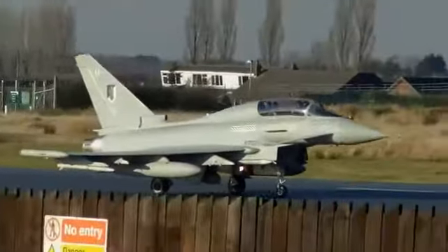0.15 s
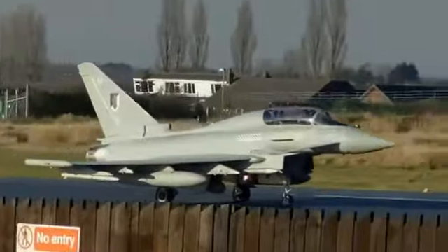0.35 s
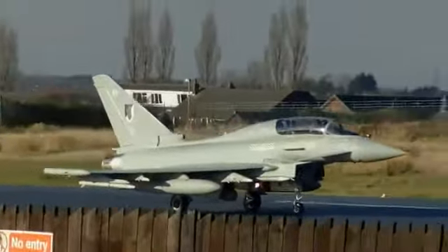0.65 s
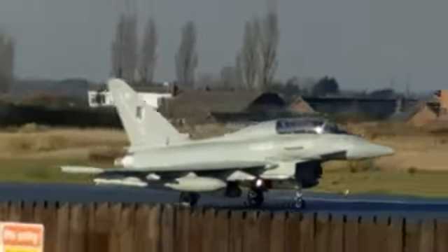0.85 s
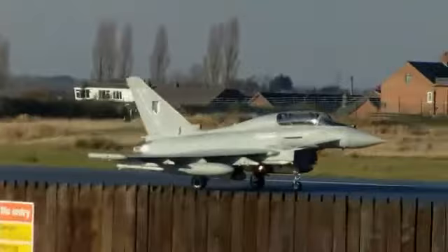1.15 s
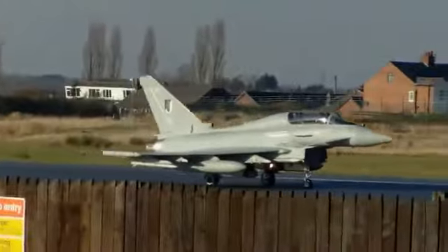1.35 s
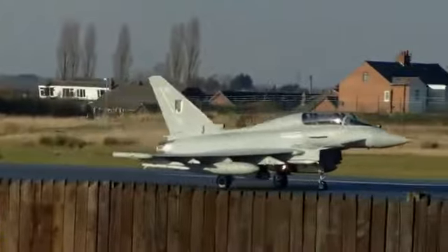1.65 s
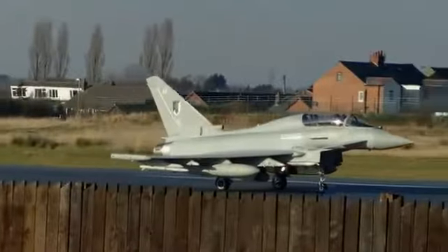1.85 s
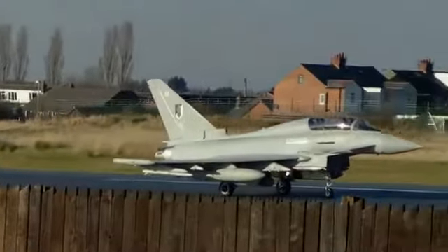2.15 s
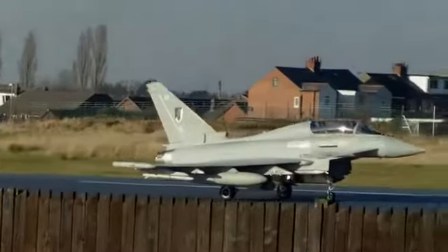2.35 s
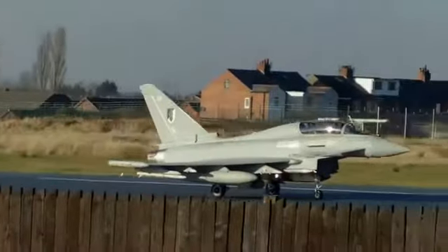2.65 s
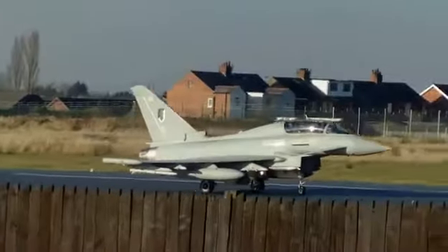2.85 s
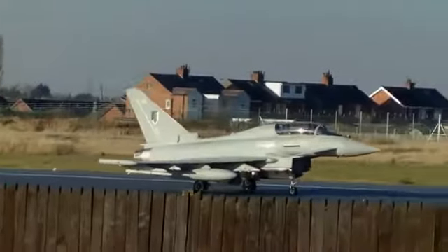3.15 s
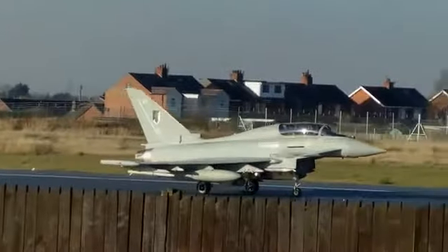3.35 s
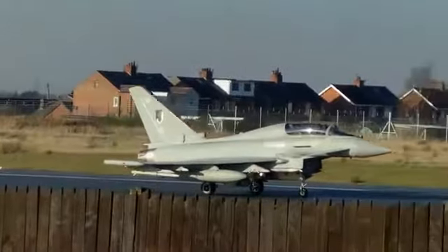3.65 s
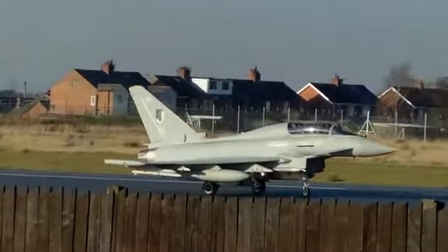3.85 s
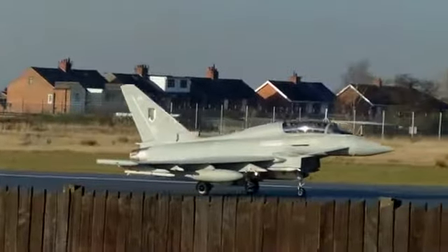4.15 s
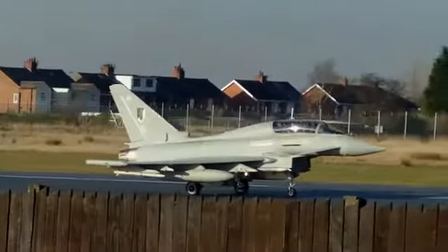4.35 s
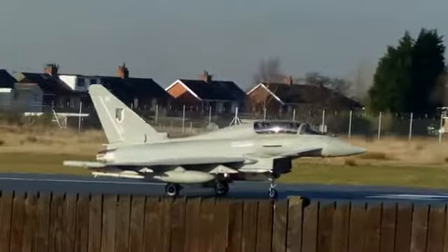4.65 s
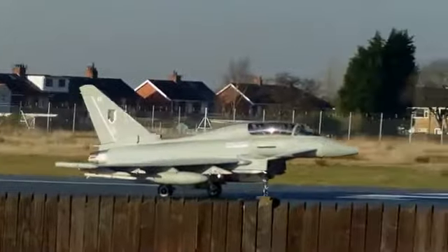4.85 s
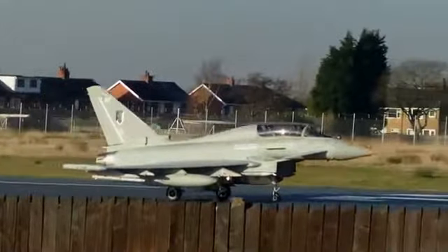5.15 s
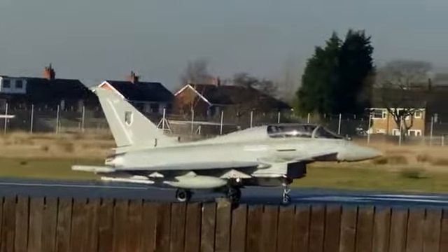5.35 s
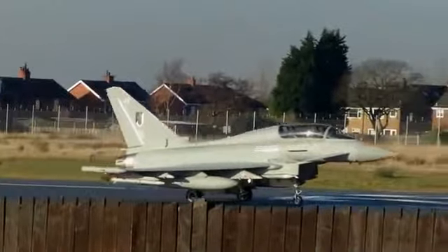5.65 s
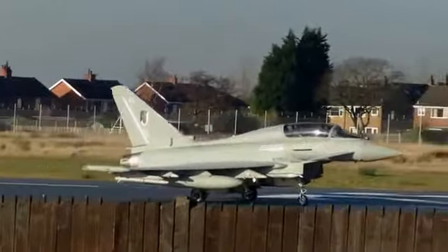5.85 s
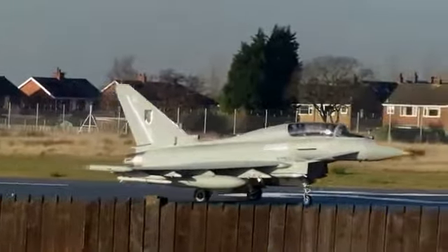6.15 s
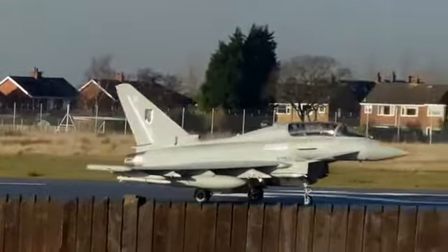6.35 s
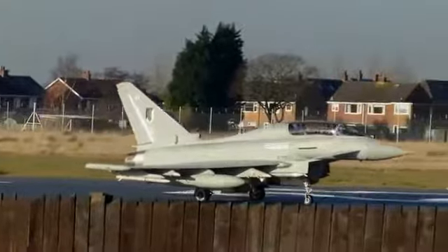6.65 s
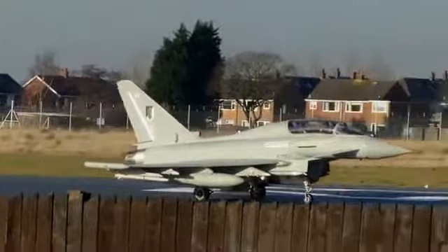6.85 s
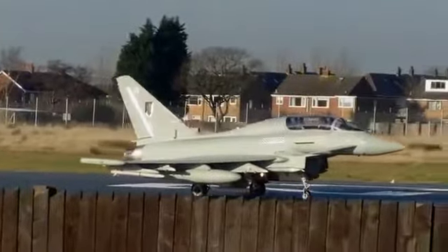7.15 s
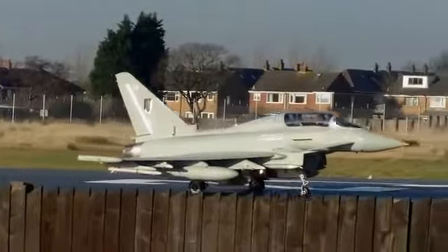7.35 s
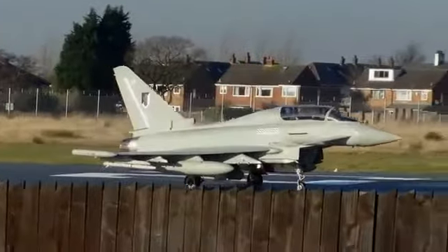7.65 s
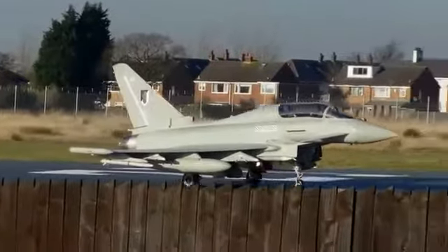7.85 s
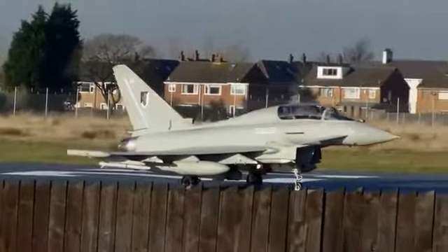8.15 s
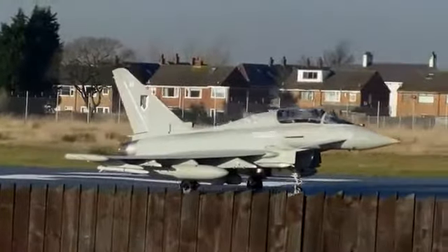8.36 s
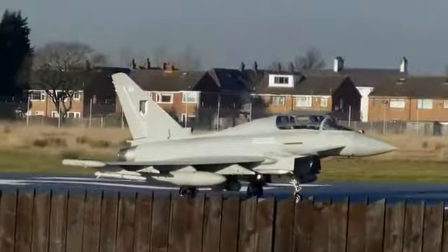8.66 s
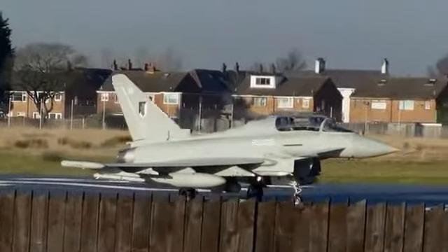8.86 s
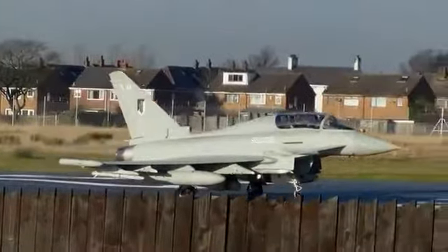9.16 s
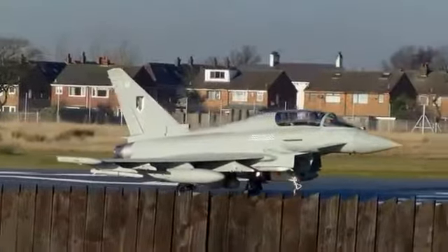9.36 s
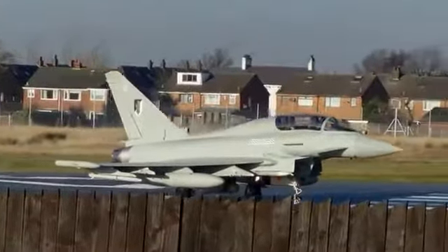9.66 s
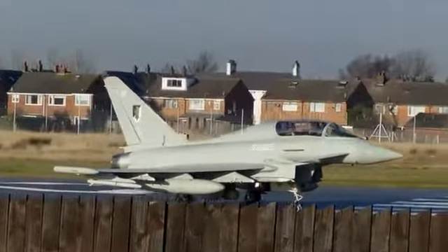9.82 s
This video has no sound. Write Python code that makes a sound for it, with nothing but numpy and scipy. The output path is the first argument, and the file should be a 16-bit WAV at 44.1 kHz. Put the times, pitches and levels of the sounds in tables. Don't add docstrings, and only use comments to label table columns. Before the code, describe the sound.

A twin-engine fighter taxies on a runway beyond a fence, heard outdoors through a small camera microphone. The sound is one unbroken jet noise: bright, sandy intake hiss concentrated around 2 to 4 kHz, faint thin whines near 5 to 6 kHz sinking very slightly in pitch, and a softer, broad exhaust roar with little deep bass. It begins moderately loud, lifts near 0.4 s, then falls to a weak, distant hiss around 1.4 s. A quick surge comes at about 1.8 s, followed by another fade until 3.4 s. From 3.6 s it climbs unevenly, with brief bright treble flickers around 4.2 to 5 s. After a small dip near 5.7 s it becomes loud and full from 6 s, the roar and low body thicker. It stays strong with gentle wavering through 10 s, slightly hollow from ground reflection and lightly grainy.

```python
import sys
import numpy as np
from scipy import signal
from scipy.io import wavfile
from scipy.ndimage import uniform_filter1d

SR = 44100
rng = np.random.default_rng(int(sys.argv[2]) if len(sys.argv) > 2 else 0)


def rack_gain(trim_db):
    fader = np.asarray(trim_db, float)
    return 10 ** (fader / 20)


def to_wav(s):
    ch = np.atleast_2d(s).T
    pcm = np.round(np.clip(ch, -1, 1) * 32767)
    wavfile.write(sys.argv[1], SR, pcm.astype(np.int16))


N = 440559
FRAME, HOP = 2048, 512

# frequency in [Hz], level in [dB per Hz].
FAN_SPECTRUM = [(1200, -52), (1600, -7.5), (1850, -4.5), (2100, 1), (3200, -3.5), (3800, -6), (4400, -13.5),
                (5200, -17), (6200, -23), (7000, -24), (7700, -27), (9500, -41.5), (15000, -81)]
# centre in [Hz], width in [Hz], height in [dB].
DUCT_HUMPS = [(2030, 250, 2), (2580, 100, 2), (3144, 260, 2.5), (4923, 460, 7), (5730, 420, 5),
              (6440, 500, 6.5), (7190, 340, 4), (7960, 400, 2)]
# time in [s], level in [dB].
PATH_LEVEL = [(0.0, -34), (0.41, -31.5), (0.64, -37), (1.39, -44), (1.77, -32.5), (2.51, -40), (3.38, -43),
              (3.62, -38.5), (3.76, -40.5), (5.51, -32), (5.65, -36), (6.0, -30.5), (6.79, -30.5),
              (7.22, -32.5), (7.57, -29.5), (8.07, -32.0), (8.3, -30.5), (9.99, -31)]
# time in [s], gain in [dB], length in [s], centre in [Hz].
EDDIES = [(0.12, -0.5, 0.09, 7100), (0.66, 8, 0.4, 890.0), (0.804, -3.5, 0.15, 3360.0),
          (0.85, -7.5, 0.28, 1030), (0.855, 4.5, 0.093, 4780), (0.87, 2, 0.79, 2260),
          (1.356, -2, 0.21, 4060), (1.9, -0.5, 0.16, 383), (2.262, 1, 0.49, 1120),
          (2.38, 5.5, 0.17, 1540.0), (2.65, -5, 0.8, 1660), (3.16, -2, 0.27, 570.0), (3.431, 5, 0.17, 1890),
          (4.11, 2.5, 0.94, 1340), (4.42, 4, 0.67, 3510.0), (4.86, -3.5, 0.16, 1120), (4.97, 2, 0.53, 483),
          (6.04, 2, 0.53, 1570), (6.73, 3, 0.11, 3830.0), (6.84, -2.2, 0.14, 1800),
          (7.13, -3.5, 0.13, 630.0), (7.323, 2.5, 0.58, 1300), (7.993, -5.5, 0.12, 680),
          (8.752, -1.5, 0.14, 930), (9.323, 1.0, 0.043, 2760.0), (9.73, -4.5, 0.083, 1590),
          (9.85, -3.5, 0.28, 4630), (9.99, 3.1, 0.69, 690.0)]
# time in [s], gain in [dB], length in [s], centre in [Hz].
WISPS = [(.85, 1.5, 0.21, 2080), (.91, -2.5, 0.33, 2520), (1.35, 3, 0.091, 2600), (1.62, -3, 0.094, 2250),
         (2.02, -2, .48, 4550), (2.64, 4, 0.19, 4830), (3.1, 0.5, 0.28, 2600), (3.28, -5, .09, 3830),
         (4.26, 1, .14, 4310), (4.59, 3, .09, 2230), (5.45, 1.5, .12, 4900), (5.86, 2.2, 0.086, 2800),
         (6.36, -3.5, .12, 4400), (7.96, -1.5, .16, 5780), (8.04, -3.5, 0.15, 1570),
         (8.99, -2.5, .12, 1720), (9.53, 0.5, .21, 1640), (9.85, -2.5, .2, 4970), (9.9, 3, .3, 6000)]
# time in [s], gain in [dB], length in [s].
GLINTS = [(0.477, 5, 0.079), (0.73, -4, 0.15), (1.605, -1.5, 0.13), (2.397, 4.5, 0.25), (3.04, -3, 0.08),
          (3.749, 7, 0.055), (4.237, 12, 0.1), (4.65, -5.5, 0.11), (4.83, 7, 0.28), (5.108, -8.5, 0.046),
          (5.36, 4.5, 0.075), (5.916, -7.5, 0.094), (6.283, 3.5, 0.5), (7.11, 6.5, 0.073),
          (7.446, 5, 0.078), (7.95, -3.5, 0.7), (8.27, 6, 0.19), (10.04, 5.5, 0.16)]
# time in [s], delay in [ms], strength [0-1] for the fan, for the exhaust [0-1].
GROUND_ECHO = [(0, 1.67, 0, 0.17), (1.5, 1.72, 0, 0.37), (3, 1.74, 0, 0.43), (3.8, 1.78, 0.1, 0.53),
               (4.4, 1.78, 0.37, 0.81), (5.5, 1.795, 0.4, 0.55), (6.5, 1.853, 0.27, 0.6),
               (7.5, 1.86, 0.44, 0.47), (8.6, 1.88, 0.27, 0.42), (10, 1.89, 0.2, 0.43)]
# frequency in [Hz], level in [dB per Hz].
ROAR_SPECTRUM = [(40, -40), (100, -28.5), (145, -14), (225, -12), (295, -21.5), (340, -17), (372, -20.5),
                 (450, -4), (500, -3.5), (750, -5), (950, 0), (1650, -2), (2400, -11), (6000, -95)]
# pitch in [Hz], level over the fan hiss in [dB], lobe time in [s], lobe height in [dB].
BLADE_TONES = [
    (4732, -29, 9.3, 7),
    (4880, -29, 7, 3),
    (5013, -31, 4.4, 7),
    (5778, -31, .2, 10),
    (6360, -39, 6.5, 3),
    (6513, -34, 5.8, 3),
]
# time in [s], pitch factor [ratio].
DOPPLER = [
    (0, 1.0),
    (1, .9995),
    (5, .995),
    (10, .9915),
]
# centre in [Hz], width in [Hz].
CAMERA_NOTCHES = [
    (3948, 220),
    (7855, 510),
]
# frequency in [Hz], level in [dB per Hz].
GRAIN_SPECTRUM = [(25, 1), (300, 6.5), (9000, 0.5), (12000, 0.5), (15000, -1)]

RIDGE_FOLLOW, UPPER_FOLLOW, TOP_FOLLOW = 0.71, 1.13, 1.09
RIDGE_TURN_DB, UPPER_TURN_DB, TOP_TURN_DB = 5, -1, -.8
ABREAST_S, TURN_S = 6.6, 1.26
EDDY_OCTAVES, WISP_OCTAVES = 0.38, 0.11
GLINT_FROM_HZ, GLINT_FULL_HZ = 3960, 7440
SKIM_MS, SKIM_STRENGTH, SKIM_END_S, SKIM_FADE_S = 1.683, 0.22, 1.84, 0.2
ROAR_DB, ROAR_TURN_DB, BODY_TURN_DB = -44, 8, -10.5
BASS_PEAK_S, BASS_SPAN_S, BASS_ARCH_DB = 6.8, 3.6, 9.5
LOBE_S = 1.1
CAMERA_TOP_HZ = 15000


def evened(x):
    return x / np.sqrt(np.mean(x ** 2) + 1e-20)


def over_hz(points, hz):
    f, value = np.transpose(points)
    return np.interp(np.log(hz + 1), np.log(f + 1), value)


def over_time(rows, t):
    s, *columns = np.transpose(rows)
    return [np.interp(t, s, column) for column in columns]


def spectral_grid():
    return np.fft.rfftfreq(FRAME, 1 / SR)[:, None], np.arange(N // HOP + 5) * HOP / SR


def noise(magnitude):
    real, imaginary = rng.standard_normal(magnitude.shape[::-1] + (2,)).T
    spectrum = np.sqrt(3 / 2) * magnitude * (real + 1j * imaginary)
    return signal.istft(spectrum, nperseg=FRAME, noverlap=FRAME - HOP)[1][:N]


def drift(shape, *, size):
    field = rng.standard_normal(shape)
    blurred_over_hz = uniform_filter1d(field, size[0], 0)
    return evened(uniform_filter1d(blurred_over_hz, size[1], 1))


def step(hz, lo_hz, hi_hz):
    return np.clip(np.log((hz + 1) / lo_hz) / np.log(hi_hz / lo_hz), 0, 1)


def swell(t, s, length):
    return np.exp(-.5 * ((t - s) / length) ** 2)


def band_gain(colour_db, hz, lo_hz, hi_hz):
    gain = rack_gain(colour_db)
    in_band = (hz >= lo_hz) & (hz < hi_hz)
    return gain / np.sqrt((gain[in_band] ** 2).sum())


def spread(hz, centres_hz, curves):
    shares = [np.interp(np.log(hz + 1), np.log(centres_hz), row) for row in np.eye(len(centres_hz))]
    return sum(share * (curve - curve.mean()) for share, curve in zip(shares, curves))


def broadside(t):
    return 1 / (1 + np.exp((ABREAST_S - t) / TURN_S))


def part_db(t, follow, turn_db):
    return (follow - 1) * over_time(PATH_LEVEL, t)[0] + turn_db * broadside(t)


def pockets(rows, octaves, hz, t):
    return sum(db * swell(t, s, length) * swell(np.log2(hz + 1), np.log2(centre_hz), octaves)
               for s, db, length, centre_hz in rows)


def air_db(hz, t):
    glints_db = sum(db * swell(t, s, length) for s, db, length in GLINTS)
    glints_db = step(hz, GLINT_FROM_HZ, GLINT_FULL_HZ) * glints_db
    return glints_db + pockets(EDDIES, EDDY_OCTAVES, hz, t) + pockets(WISPS, WISP_OCTAVES, hz, t)


def bounce(hz, delay_ms, strength):
    losses = (1 + (hz / 4200) ** 4) * (1 + (1050 / (hz + 1)) ** 6)
    echo = np.clip(strength, -1, 1) / np.sqrt(losses)
    phase = np.exp(-2j * np.pi * hz * delay_ms / 1000 + .2j)
    return (1 + echo * phase) / np.sqrt(1 + echo ** 2)


def fan():
    hz, t = spectral_grid()
    humps_db = sum(db / (1 + (2 * (hz - f) / width) ** 4) for f, width, db in DUCT_HUMPS)
    gain = band_gain(over_hz(FAN_SPECTRUM, hz) + humps_db, hz, 2500, 3800)

    level_db = over_time(PATH_LEVEL, t)[0] + air_db(hz, t)
    ridge_db = part_db(t, RIDGE_FOLLOW, RIDGE_TURN_DB)
    upper_db = part_db(t, UPPER_FOLLOW, UPPER_TURN_DB)
    top_db = part_db(t, TOP_FOLLOW, TOP_TURN_DB)
    tilt_db = spread(hz, [2030, 2570, 3360, 4520, 6500, 8800],
                     [ridge_db, 0 * t, 0 * t, upper_db, top_db, 1.23 * top_db])
    patches_db = 0.7 * drift((len(hz), len(t)), size=(28, 20))
    flicker_db = 1.0 * step(hz, 3300, 8600) * drift((len(hz), len(t)), size=(300, 3))

    delay_ms, strength, _ = over_time(GROUND_ECHO, t)
    skim_strength = -SKIM_STRENGTH / (1 + np.exp((t - SKIM_END_S) / SKIM_FADE_S))
    echoes = bounce(hz, delay_ms, strength) * bounce(hz, SKIM_MS, skim_strength)
    return noise(gain * rack_gain(level_db + tilt_db + patches_db + flicker_db) * echoes)


def roar():
    hz, t = spectral_grid()
    gain = band_gain(over_hz(ROAR_SPECTRUM, hz), hz, 900, 1600)
    level_db = ROAR_DB + ROAR_TURN_DB * broadside(t)
    body_db = BODY_TURN_DB * broadside(t)
    bass_db = BASS_ARCH_DB * swell(t, BASS_PEAK_S, BASS_SPAN_S) - level_db
    tilt_db = spread(hz, [192, 347, 774, 850], [-level_db, bass_db, body_db, 0 * t])
    patches_db = 1.45 * drift((len(hz), len(t)), size=(12, 20))
    delay_ms, _, strength = over_time(GROUND_ECHO, t)
    echo = bounce(hz, delay_ms, strength)
    return noise(gain * rack_gain(level_db + tilt_db + patches_db + air_db(hz, t)) * echo)


def blades():
    t = np.arange(N) / SR
    frames = spectral_grid()[1]
    level_db = over_time(PATH_LEVEL, t)[0]
    treble_db = part_db(t, UPPER_FOLLOW, UPPER_TURN_DB)
    fades = drift((len(BLADE_TONES), len(frames)), size=(1, 45))
    wavers = drift((len(BLADE_TONES), len(frames)), size=(1, 6))
    doppler = over_time(DOPPLER, t)[0]
    tones = np.zeros(N)
    for (hz, db, lobe_s, lobe_db), fade, waver in zip(BLADE_TONES, fades, wavers):
        pitch_hz = hz * doppler + 4.08 * np.interp(t, frames, waver)
        fade_db = np.interp(t, frames, 2.8 * fade + air_db(hz, frames))
        tone_db = db + lobe_db * swell(t, lobe_s, LOBE_S) + fade_db
        tones += rack_gain(tone_db) * np.sin(2 * np.pi * np.cumsum(pitch_hz) / SR)
    return np.sqrt(2) * rack_gain(level_db + treble_db - treble_db.mean()) * tones


def scene():
    return (fan() + roar() + blades())[None]


def camera_notches(x):
    for hz, width in CAMERA_NOTCHES:
        x = signal.lfilter(*signal.iirnotch(hz, hz / width, SR), x)
    return x


def converter_grain(x):
    slope = np.diff(x, prepend=0) ** 2
    size = np.sqrt(abs(.75 * uniform_filter1d(slope, size=9) + .25 * uniform_filter1d(slope, size=800)))
    hz, t = spectral_grid()
    grain = evened(noise(rack_gain(over_hz(GRAIN_SPECTRUM, hz)) * np.ones(len(t))))
    return rack_gain(-20) * size * grain


def low_pass(x):
    return signal.sosfilt(signal.butter(12, 15690, fs=SR, output="sos"), x)


def record(dry):
    x = camera_notches(dry[0])
    x = x + converter_grain(x)
    lowpass = signal.firwin(1023, CAMERA_TOP_HZ, window=("kaiser", 9), fs=SR)
    mix = signal.oaconvolve(x, lowpass, "same")
    return low_pass(mix[None])


dry = scene()
out = record(dry)
to_wav(out)
```